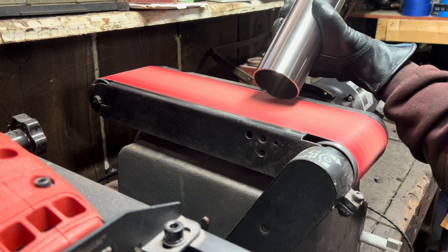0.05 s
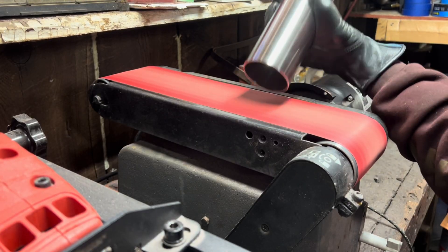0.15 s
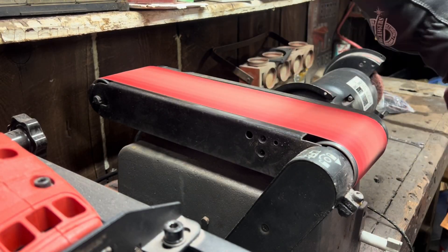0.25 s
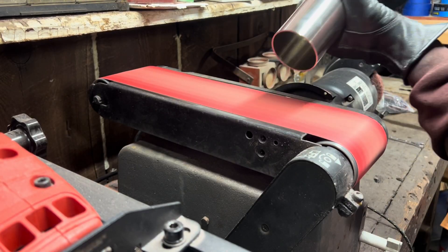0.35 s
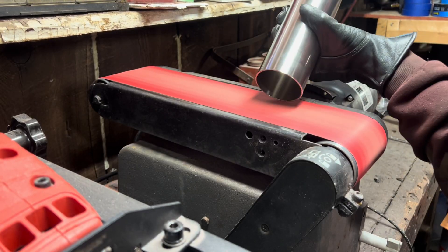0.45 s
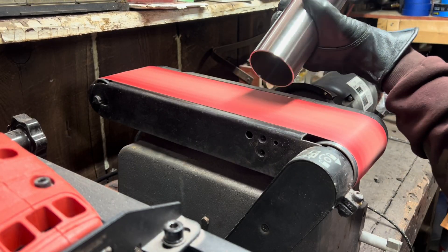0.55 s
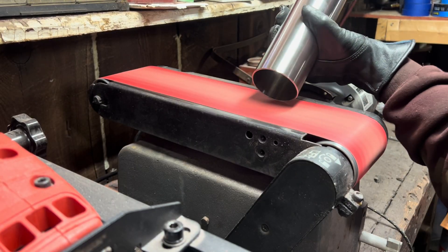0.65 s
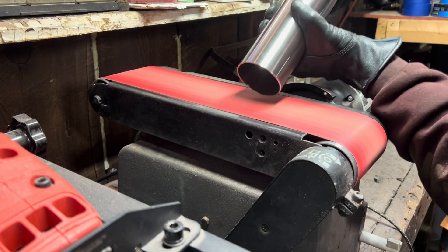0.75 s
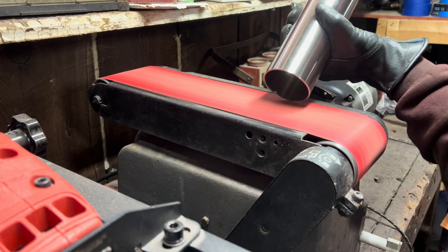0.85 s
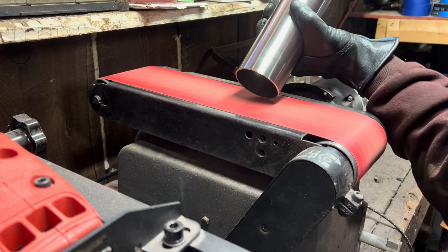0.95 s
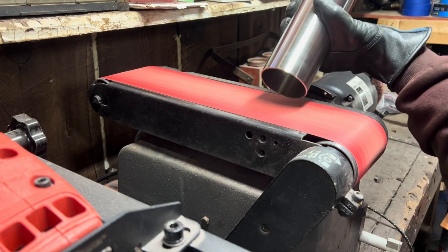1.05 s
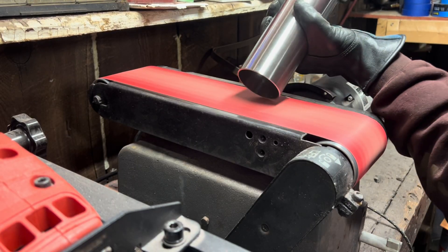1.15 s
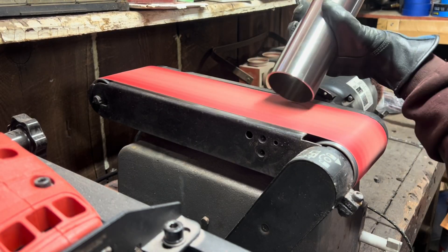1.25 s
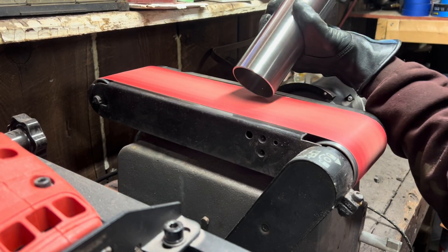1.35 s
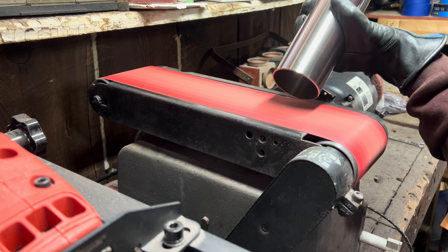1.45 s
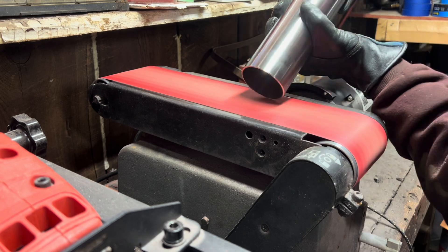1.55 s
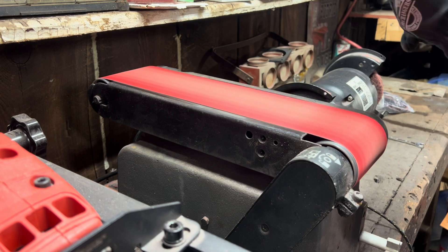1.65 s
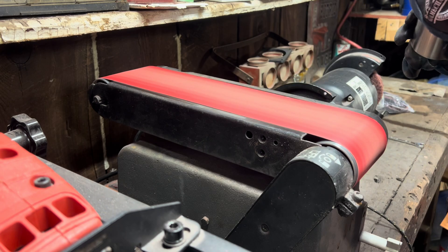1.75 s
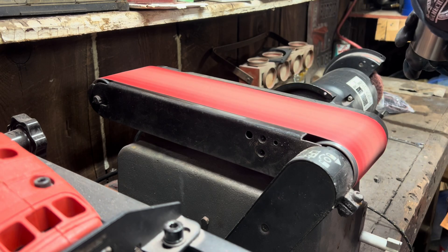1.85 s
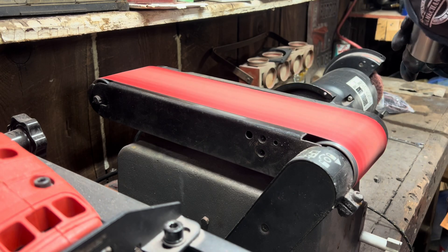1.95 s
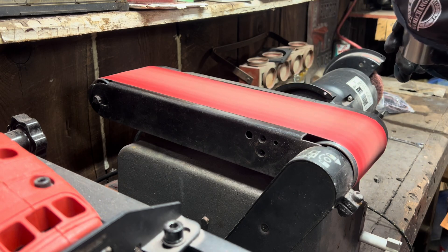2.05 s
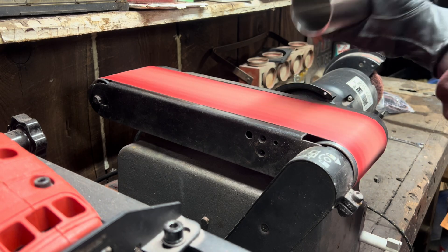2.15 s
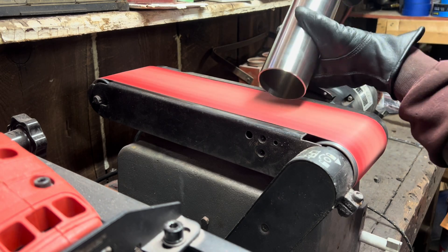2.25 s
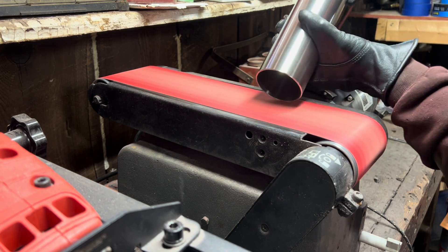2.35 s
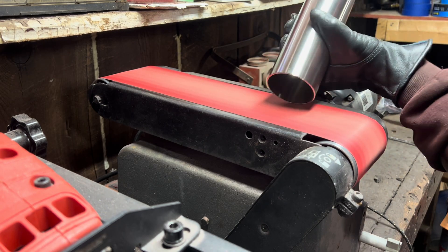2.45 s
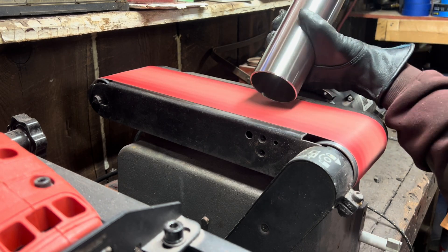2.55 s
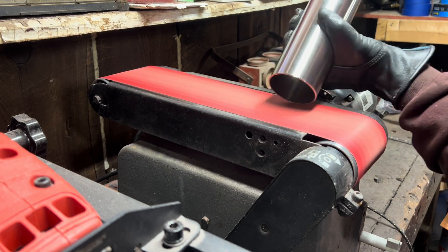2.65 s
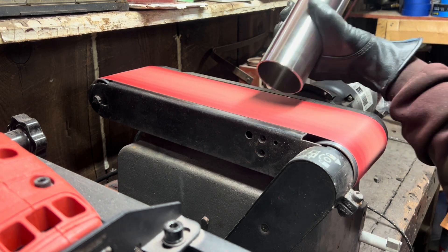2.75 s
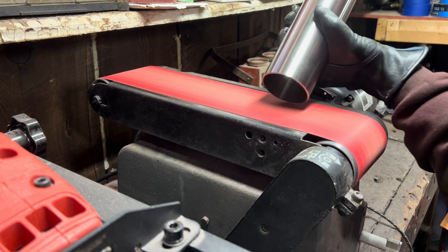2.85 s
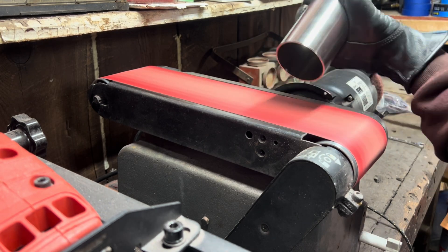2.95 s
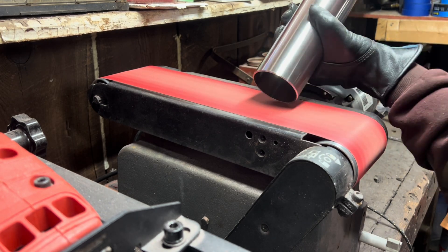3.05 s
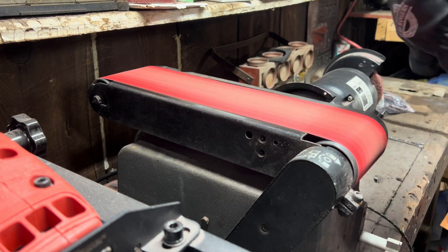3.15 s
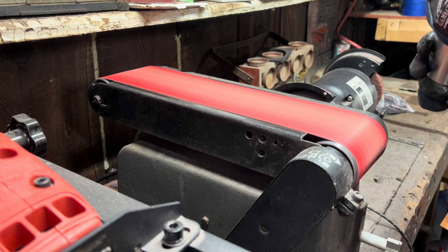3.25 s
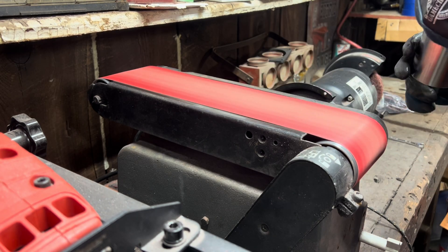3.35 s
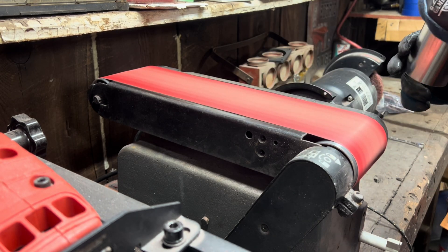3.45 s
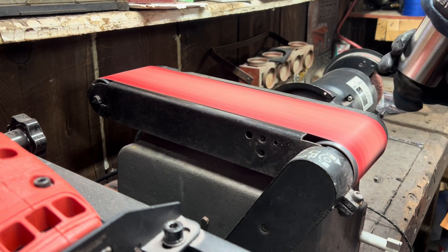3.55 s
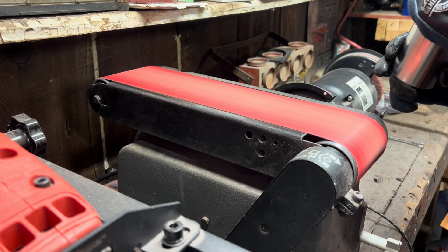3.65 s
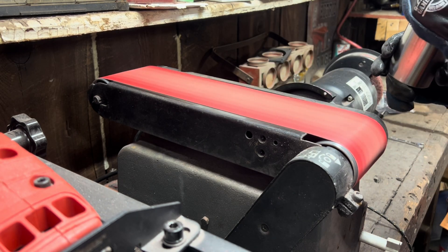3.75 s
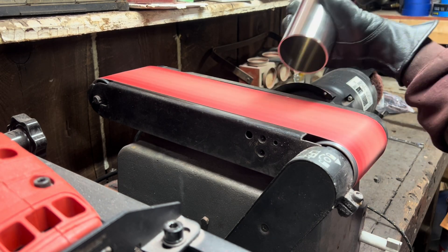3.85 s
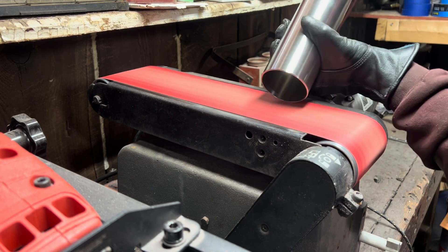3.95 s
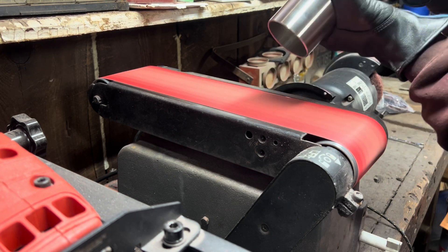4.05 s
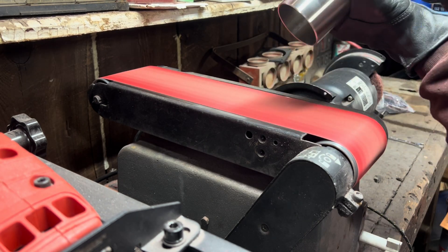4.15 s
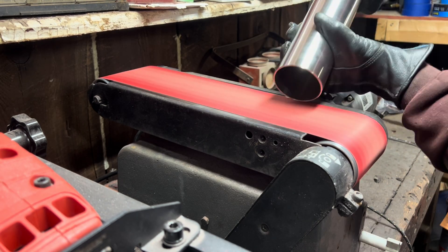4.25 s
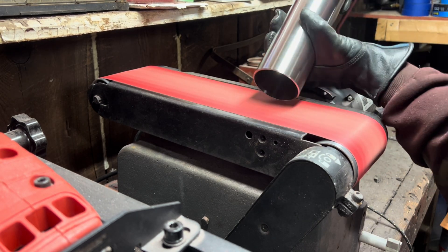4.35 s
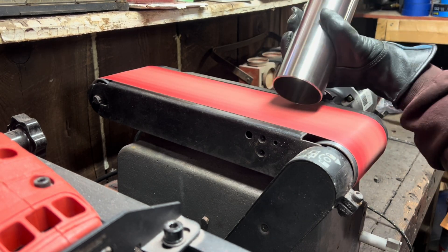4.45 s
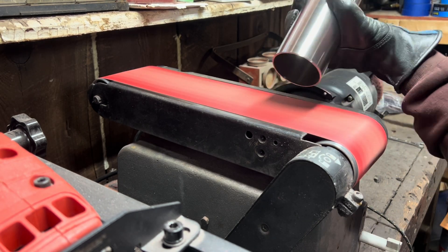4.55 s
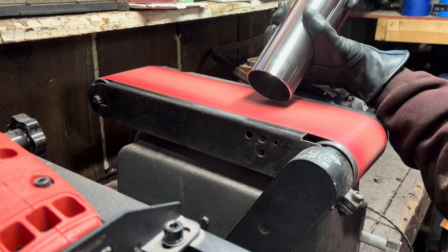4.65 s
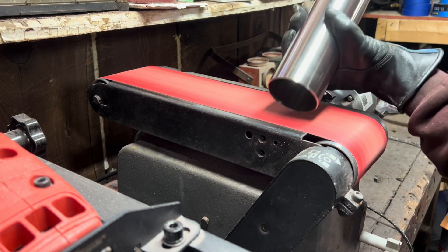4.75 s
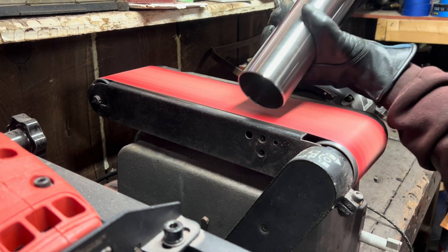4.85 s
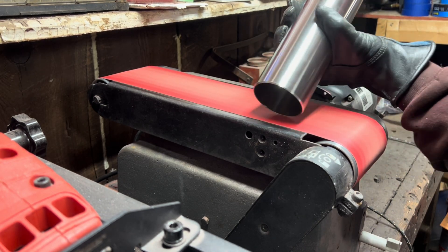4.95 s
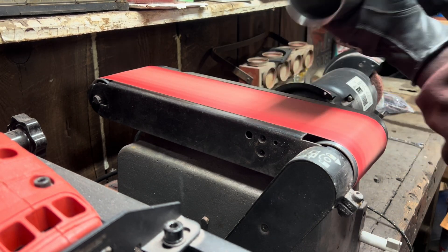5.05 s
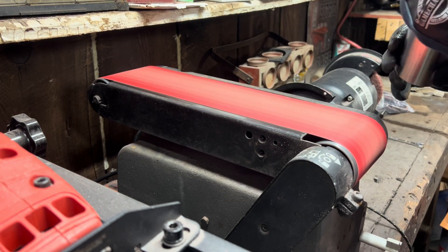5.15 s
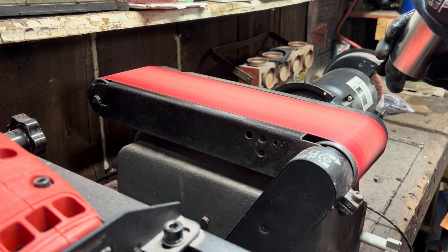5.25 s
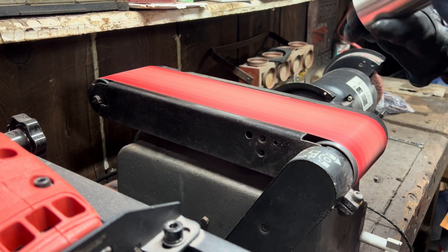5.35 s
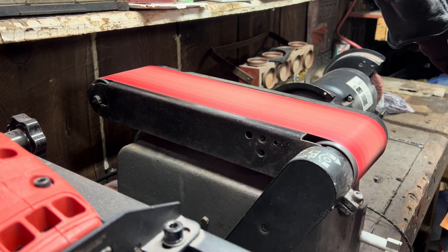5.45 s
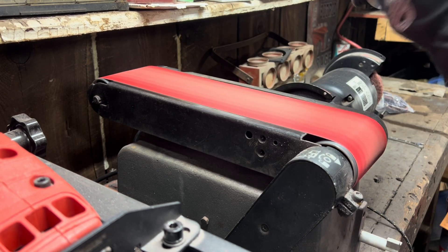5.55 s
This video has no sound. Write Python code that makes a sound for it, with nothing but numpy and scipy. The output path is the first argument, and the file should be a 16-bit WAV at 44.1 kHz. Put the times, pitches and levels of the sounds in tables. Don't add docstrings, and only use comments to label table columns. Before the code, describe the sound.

A bench sander whines continuously with mid-range hums, thin high tones, an unsteady squeal and gritty airy hiss. Over it, a hand-held thin-walled metal tube is dabbed repeatedly on the belt, giving short hissing, ringing scrapes in three groups separated by pauses. Strokes grow stronger and brighter towards the end, then the machine runs alone. Near, dry small-room stereo pickup with little bass.

```python
import sys
import numpy as np
from scipy import signal
from scipy.fft import rfft, irfft, next_fast_len
from scipy.io import wavfile
from scipy.ndimage import uniform_filter1d

SR = 44100
rng = np.random.default_rng(int(sys.argv[2]) if len(sys.argv) > 2 else 0)


def materialize(psi):
    bounded = np.clip(np.atleast_2d(psi).T, -1, 1)
    quanta = np.round(bounded * 32767).astype(np.int16)
    wavfile.write(sys.argv[1], SR, quanta)


def linear_from_db(decibels):
    return 10 ** (np.asarray(decibels, float) / 20)


N = 246959
TIME = np.arange(N) / SR
FFT_SIZE = next_fast_len(N)
HZ = np.fft.rfftfreq(FFT_SIZE, 1 / SR) + 1e-3


def unit(x):
    return x / np.sqrt(np.mean(x ** 2))


def filtered(x, gain):
    return irfft(rfft(x, FFT_SIZE) * gain, FFT_SIZE)[..., :N]


def colour_db(points):
    hz, db = np.transpose(points)
    return np.interp(np.log(HZ), np.log(hz), db)


def bumps_db(modes):
    return sum(db / (1 + (2 * (HZ - hz) / width) ** 2) for hz, width, db in modes)


def ringing(modes):
    response = 0
    for k, (hz, width, db) in enumerate(modes):
        detuning = (HZ / hz - hz / HZ) * hz / width
        response = response + (-1) ** k * linear_from_db(db) / (1 + 1j * detuning)
    return response


def raised(modes, factor):
    return [(hz * factor, width, db) for hz, width, db in modes]


def walk(rate):
    hold = int(SR / rate)
    steps = np.repeat(rng.standard_normal(600), hold)[:N]
    return unit(uniform_filter1d(uniform_filter1d(steps, hold), hold))


def curve(table, column):
    return np.interp(TIME, [row[0] for row in table], [row[column] for row in table])


def gate(start, length, rise, fall):
    return np.clip(np.minimum((TIME - start) / rise, (start + length - TIME) / fall), 0, 1)


def sine(hz, clock, phase=0):
    return np.sqrt(2) * np.sin(2 * np.pi * hz * clock + phase)


def flickering(x, low_hz, flicker_db, rate, count=14, tilt_db=0.):
    place = np.clip(np.log(HZ / low_hz) / np.log(16000 / low_hz), 0, 1) * (count - 1)
    spectrum = rfft(x, FFT_SIZE)
    out = np.zeros(N)
    for k in range(count):
        band = irfft(spectrum * np.clip(1 - abs(place - k), 0, 1), FFT_SIZE)[:N]
        out += linear_from_db(flicker_db * walk(rate) + tilt_db * (k / count) ** 2) * band
    return out


def grit(spread_db, density):
    strikes, sign, size = rng.random((3, N))
    size_db = -spread_db * np.log(size + .01)
    clicks = (strikes < density / SR) * np.sign(sign - .5) * linear_from_db(size_db)
    return unit(unit(clicks) + 0.61 * rng.standard_normal(N))


# start_s, level_db
LOUDNESS = [
    (0.0, -39.5),
    (0.4, -37.5),
    (1.6, -38.5),
    (2.4, -36),
    (3.2, -39.5),
    (3.9, -35),
    (4.3, -36),
    (5.15, -39.5),
    (5.6, -37.5),
]


def drift_db():
    return curve(LOUDNESS, 1) + 38


def load(lag_s):
    touch = sum(gate(start, length, LAND_S, LIFT_S) for start, length, *_ in STROKES)
    keep = np.exp(-1 / (lag_s * SR))
    return signal.lfilter([1 - keep], [1, -keep], touch)


# start_s, length_s, hiss_gain_db, extra_treble_db
PUFFS = [(.003, 0.067, 4.5, 10), (0.187, 0.016, 2.5, 11), (.295, 0.018, 4, 3), (0.41, 0.034, 1, -13),
         (1.604, 0.046, 3, 9), (1.73, 0.024, 2, 8), (1.825, 0.05, 3.5, 5), (1.908, .025, 5, -7),
         (1.985, 0.02, 3.5, 0), (2.09, 0.046, 2.5, 5), (2.218, .015, 3, -3), (2.255, .036, 3, 3),
         (3.15, .022, 3, -3), (3.195, 0.017, 5.5, -8), (3.279, .045, 4.5, 0), (3.404, 0.042, 3, 2),
         (3.535, 0.037, 2.5, -5), (3.643, 0.035, 2.5, -4), (3.78, 0.08, 2, 1), (4.052, 0.023, 4.5, 0),
         (4.107, 0.014, -1, -4), (4.19, 0.023, 5, -1), (4.703, 0.047, 1.5, 4), (5.112, 0.047, 0.5, 4),
         (5.186, .027, 3.5, -8), (5.361, 0.033, 4.5, -2), (5.47, 0.052, 4.5, -1), (5.566, .036, 0.5, -4)]


def flap_db():
    edge_s = 0.012
    flaps = np.array([gate(start - edge_s / 2, length + edge_s, edge_s, edge_s) for start, length, *_ in PUFFS])
    return np.array(PUFFS)[:, 2:].T @ flaps


# hz, level_db (per Hz)
ROAR_COLOUR = [(25, -35), (170, -35), (230, -32.5), (300, -16.5), (345, -10), (420, -8), (600, -3),
               (800, -5.5), (1230, -8), (1700, -9), (2100, -8.5), (3500, -6), (5000, -8.5), (7000, -21)]
# hz, width_hz, level_db
PANELS = [(340, 73, 3), (597, 4.6, 8), (880, 10, 8.5), (3110, 100, -5), (483, 60, 8.5), (693.5, 41, 9.5),
          (990, 12, 9), (1077, 36, 9.5), (1632, 13, 7.5), (1697, 36, 9.5), (1865, 28, 8.5)]


def roar():
    noise = filtered(rng.standard_normal(N), linear_from_db(colour_db(ROAR_COLOUR) + bumps_db(PANELS)))
    return linear_from_db(-38.0) * unit(flickering(noise, 510.0, flicker_db=1.07, rate=10, count=6))


# hz, level_db
WHINES = [(1600, -62), (2960, -63), (3500, -62), (5380, -54), (5470, -55), (8110, -49), (8580, -54),
          (9155, -57), (9665, -57), (9790, -58), (11860, -60)]


def whines():
    clock = TIME + 1.5e-5 * walk(20)
    return sum(linear_from_db(db + 2.7 * walk(6.9)) * sine(hz, clock) for hz, db in WHINES)


# hz, level_db, phase_wander_rad, wander_rate_per_s
ROLLERS = [
    (349.8, -47.5, 1.2, 8),
    (697, -47, 2.2, 14),
    (1078, -57, 2.2, 16),
]


def rollers():
    return sum(linear_from_db(db + 0.83 * walk(9)) * sine(hz, TIME, rad * walk(rate)) for hz, db, rad, rate in ROLLERS)


# hz, level_db
TONES = [(177.8, -78.0), (291.0, -76.0), (589.2, -42.5), (600.2, -58.0), (646.7, -61.0), (711.1, -47.0),
         (818.7, -60.0), (845.0, -63.0), (888.8, -54.0), (946.0, -54.0), (953.4, -56.0), (1022.8, -65.0),
         (1200.4, -52.0), (1378.2, -56.0), (2383.9, -58.0), (3089.9, -64.0), (4124.3, -64.0),
         (4291.5, -56.0), (4768.8, -51.0), (5245.0, -57.0), (5581.7, -49.0), (5880.8, -57.0),
         (5980.2, -52.0), (6198.8, -56.0), (6977.0, -50.0), (9060.0, -50.5), (9282.5, -56.5),
         (9537.0, -56.0), (14305.2, -57.5)]


def motor():
    return sum(linear_from_db(db + 1.15 * walk(5.99)) * sine(hz, TIME, 0.58 * walk(2.994)) for hz, db in TONES)


# start_s, stack_db, whistle_db
SQUEAL = [(0.0, -41.5, -43), (0.03, -47, -39), (0.39, -44.5, -39), (0.93, -48.5, -38), (1.14, -45, -38),
          (1.81, -48.5, -32.5), (1.84, -41.5, -34), (2.01, -47, -37), (2.04, -52.5, -42), (2.17, -43, -36),
          (2.95, -50.5, -43), (3.13, -47, -37), (3.35, -51.5, -37.5), (3.93, -42.5, -32), (3.94, -45, -35),
          (5.43, -50.5, -37.5), (5.52, -44, -37), (5.6, -45.5, -32)]
# multiple, level_db
SQUEAL_ORDERS = [(2, -8), (4, -12), (5, 2), (6, -3.5), (7, -4.5), (8, -7), (9, -10), (10, -11), (13, -2),
                 (14, 1.5), (15, 4), (17, 1)]


def squeal():
    drag = load(lag_s=0.029)
    slip_hz = 473.4 - 7 * drag
    turns = np.cumsum(slip_hz * (1 + 0.0016 * walk(40) + 0.000923 * walk(12))) / SR
    stack = np.zeros(N)
    for order, db in SQUEAL_ORDERS:
        stack += linear_from_db(db + 2.82 * walk(30)) * np.sin(2 * np.pi * (order * turns + rng.random()))
    whistle = linear_from_db(3.6 * walk(50) + 1.5 * walk(18)) * np.sin(2 * np.pi * 12 * turns)
    stack_db = curve(SQUEAL, 1) + 3.0 + 0.72 * flap_db()[0]
    whistle_db = curve(SQUEAL, 2) + 1.5 + 0.5 * drag
    return linear_from_db(stack_db) * stack + linear_from_db(whistle_db) * whistle


# hz, level_db (per Hz)
HISS_COLOUR = [(300, -90), (2500, -9.5), (4000, -12.5), (5000, -4), (7000, 3.5), (9000, 2), (11000, -3),
               (13500, -9.5), (16000, -14.5)]
# hz, width_hz, level_db
HISS_MODES = [(5648, 250, 11), (6060, 114, 7), (6380, 200, -10.5), (6800, 210, 3.5), (8140, 370, 5),
              (9320, 380, -7), (11570, 460, 4.5), (12440, 300, -7), (13000, 700, 7), (7880, 250, -2),
              (9780, 200, -6.5), (13800, 200, 3)]


def belt():
    rub = grit(spread_db=2.5, density=9000) * linear_from_db(0.97 * walk(60))
    noise = unit(filtered(rub, linear_from_db(colour_db(HISS_COLOUR) + bumps_db(HISS_MODES))))
    gain_db, treble_db = flap_db()
    level_db = -29.5 + 0.84 * drift_db() + load(lag_s=.006) + gain_db
    return linear_from_db(level_db) * flickering(noise, 4140.0, flicker_db=2.08, rate=22, tilt_db=-2 + 0.44 * treble_db)


# hz, width_hz, level_db
TUBE_LOW = [(1625, 326, -10.5), (5263, 460, -0.5), (5540, 320, 2.5), (5880, 266, 3.5), (6900, 116, 0.5)]
TUBE_RING = [(7660, 110, -3), (8100, 280, 2.5), (8520, 220, 0.5), (9040, 280, -6.5)]
TUBE_RIM = [(10020, 280, -0.086), (10280, 360, -0.91)]
TUBE_HIGH = [(11250, 500, -5), (12340, 620, 6), (13500, 500, 2), (14600, 360, 4)]
# hz, level_db (per Hz)
TUBE_SHEEN = [(2500, -47), (6000, -7), (9000, -6.5), (12000, -0.5), (14000, -6.5), (16000, -12)]
# start_s, length_s, ring_db, wall_db (wall modes relative to ring), fade_db (ring over stroke)
STROKES = [(0.073, .11, -30, -1.5, 2), (0.413, 0.16, -27.5, -3, 2), (0.635, 0.14, -24.5, -6.5, 10),
           (0.858, .156, -26, -6.5, 8), (1.082, 0.14, -24, -9.5, 13), (1.283, 0.12, -26, -6, 7),
           (1.492, 0.11, -23, -10, 12), (2.304, 0.099, -23.5, -5.5, 0.5), (2.477, 0.11, -23, -6, 0),
           (2.651, 0.11, -19.5, -11.5, 11), (2.849, 0.088, -20.5, -10, 8), (3.015, .112, -22, -9.5, 7),
           (3.931, 0.0947, -21, -6.5, 2), (4.291, 0.096, -20.5, -7.5, 2), (4.439, 0.11, -21, -9.5, 0.5),
           (4.613, .095, -20, -12, 12), (4.785, 0.099, -19, -11.5, 7), (4.949, 0.1, -18.5, -11.5, 8.5)]
LAND_S, LIFT_S, BITE_S = 0.00304, .011, .022


def grinding():
    force = grit(spread_db=3.5, density=8900) * linear_from_db(0.67 * walk(90))
    thin_wall = 1 / (1 + (900 / HZ) ** 4)

    def struck(response):
        return unit(filtered(force, response))

    def sheen(modes):
        return linear_from_db(colour_db(TUBE_SHEEN) + bumps_db(modes))

    low, ring, rim = (struck(thin_wall * ringing(modes)) for modes in (TUBE_LOW, TUBE_RING, TUBE_RIM))
    high = struck(sheen(TUBE_HIGH))
    tipped = TIME > 4.75
    steep_rim = TUBE_RIM + [(9370, 300, 0.00025)]
    ring = np.where(tipped, struck(ringing(raised(TUBE_RING, 1.029))), ring)
    rim = np.where(tipped, struck(ringing(raised(steep_rim, 1.029))), rim)
    high = np.where(tipped, struck(sheen(raised(TUBE_HIGH, 1.06))), high)

    out = np.zeros(N)
    for start, length, ring_db, wall_db, fade_db in STROKES:
        age = TIME - start
        softness = np.clip((-16.5 - ring_db) / 7, .2, 1.3)
        bite_db = -7 * softness * np.clip(1 - age / BITE_S, 0, 1)
        roll_db = fade_db * np.clip((age - BITE_S) / (length - BITE_S), 0, 1)
        wall = linear_from_db(2.5 + 0.21 * roll_db + 2.0 * bite_db) * low
        wall += linear_from_db(-.5 + 0.2 * roll_db + 0.52 * bite_db) * high
        wall += linear_from_db(-5.5 + 0.77 * roll_db + 0.55 * bite_db) * rim
        tube = linear_from_db(bite_db - roll_db) * ring + linear_from_db(wall_db) * wall
        out += gate(start, length, LAND_S, LIFT_S) * linear_from_db(ring_db) * tube
    return flickering(out, 3650.0, flicker_db=1.0, rate=25)


# hz, level_db (side minus mid)
SIDE_DB = [(60, -5), (110, -15), (200, -15), (380, -23), (700, -31), (1290, -8), (2380, -12), (4400, -6),
           (8120, -9.5), (15000, -2)]
# hz, level_db (left minus right)
LEAN_DB = [(60, -.2), (110, 2), (200, -2.7), (380, 0.3), (700, 0.5), (1290, 0), (2380, -1.5), (4400, 1.5),
           (8120, -1.5), (15000, 4)]


def scene():
    machine = motor() + rollers() + roar() + whines()
    mid = linear_from_db(drift_db()) * machine + squeal() + belt() + grinding()
    echoes = rng.standard_normal(8192) * np.exp(-np.arange(8192) / (.022 * SR))
    echoes = rfft(echoes / np.sqrt(np.sum(echoes ** 2)), FFT_SIZE)
    echoes = echoes / (abs(echoes) + .1) ** .75
    lean = np.tanh(colour_db(LEAN_DB) * np.log(10) / 40)
    side = filtered(mid, echoes * linear_from_db(colour_db(SIDE_DB) - 0.1) + lean)
    return np.array([mid + side, mid - side])


def top_cut(x):
    return signal.sosfilt(signal.butter(12, 16880, fs=SR, output="sos"), x)


def record(dry):
    mix = filtered(dry, 1 / (1 + (HZ / 15740) ** 900))
    return top_cut(mix)


dry = scene()
out = record(dry)
materialize(out)
```